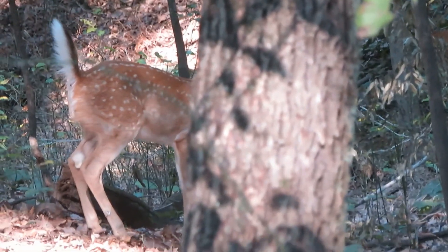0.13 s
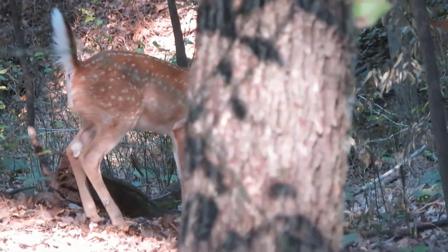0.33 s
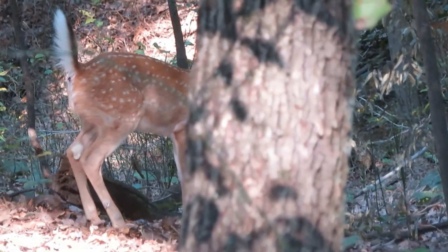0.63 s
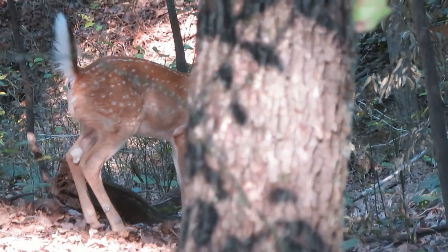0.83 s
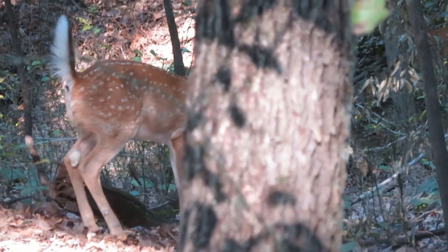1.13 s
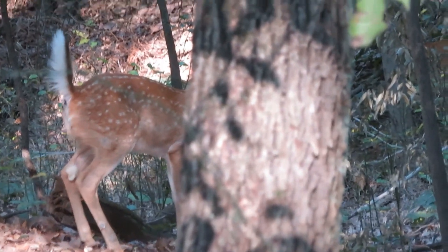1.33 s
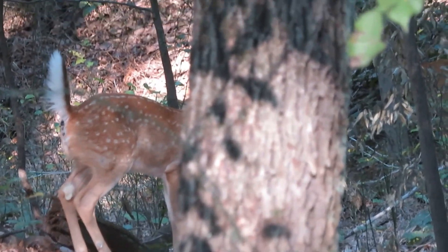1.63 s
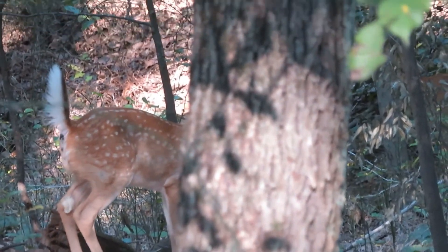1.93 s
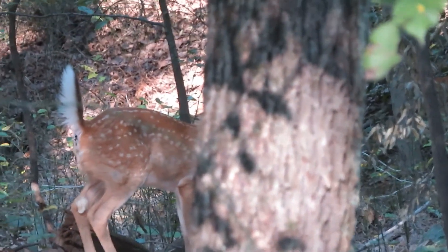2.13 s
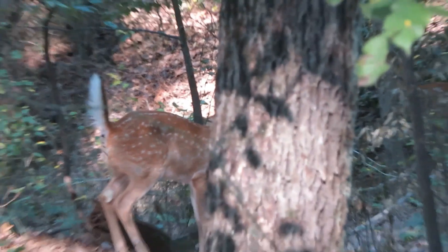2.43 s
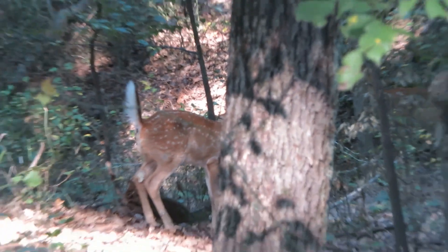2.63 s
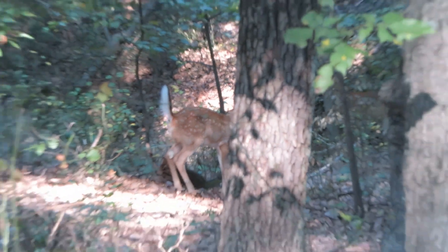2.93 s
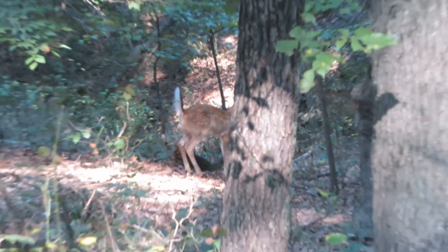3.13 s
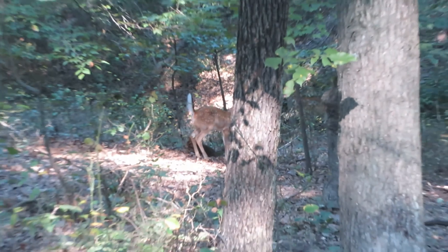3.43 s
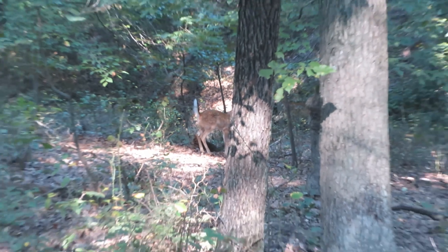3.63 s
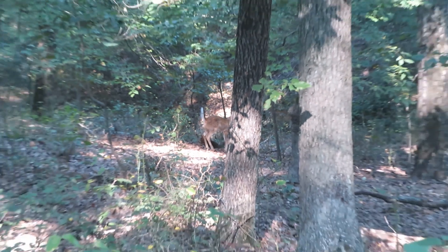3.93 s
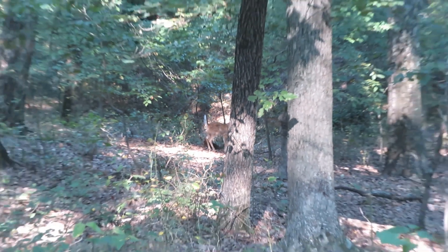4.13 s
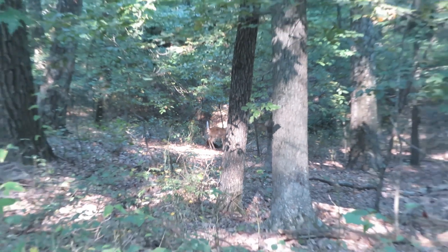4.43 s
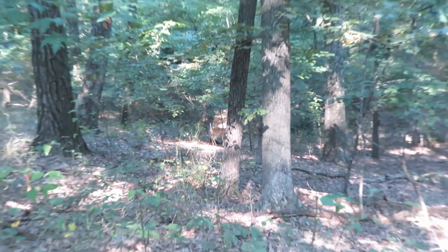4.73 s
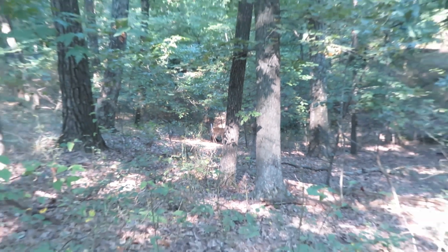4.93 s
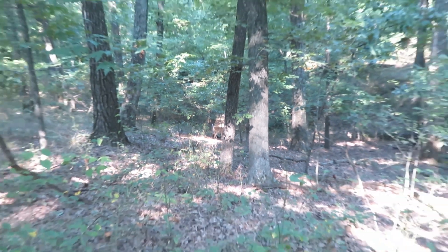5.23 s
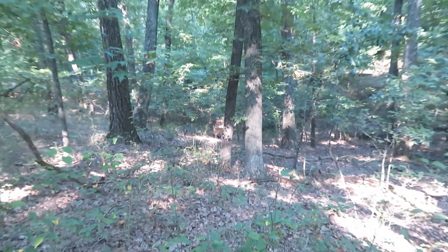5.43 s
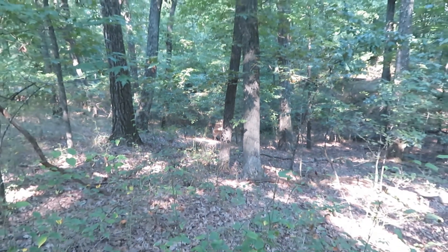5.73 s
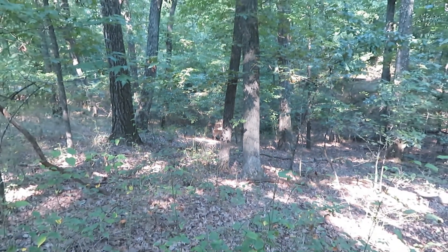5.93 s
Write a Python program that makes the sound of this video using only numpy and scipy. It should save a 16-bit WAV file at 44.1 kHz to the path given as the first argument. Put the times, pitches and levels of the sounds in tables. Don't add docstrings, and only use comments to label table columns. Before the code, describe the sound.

A quiet wood with a road far off. From 0 s a low, slightly uneven traffic rumble carries a droning engine near a low hum, while another fades away. Over it lie soft air hiss and a high, shimmering insect chorus throbbing about seven times a second, swelling until roughly 4.7 s. Two faint bird peeps come at 1.6 and 1.7 s. Around 2.3 s a car passes briefly with a short gear whine; the hiss becomes duller and patchier as the zoom runs until 5.8 s, its faint motor tone nearly buried. The engine drops at 2.5 s, then pulls again, higher, by 3.4 s. From 3.6 s a cricket chirps about seven times a second, growing louder. Traffic is strongest near 4.3 s, a second engine gaining speed, then recedes. At 5.8 s the treble opens again; at 6.05 s a hard, bright plastic click snaps close to the microphone.

```python
import sys
import numpy as np
from scipy import signal
from scipy.fft import rfft, irfft, next_fast_len
from scipy.io import wavfile
from scipy.ndimage import uniform_filter1d, map_coordinates

SR = 44100
rng = np.random.default_rng(int(sys.argv[2]) if len(sys.argv) > 2 else 0)


def master(y):
    cut = np.clip(np.atleast_2d(y).T, -1, 1)
    pcm = np.round(cut * 32767)
    wavfile.write(sys.argv[1], SR, pcm.astype(np.int16))


def undo_db(level):
    steps = np.asarray(level, float) / 20
    return 10 ** steps


N = 268921
TIME = np.arange(N) / SR

# (start [s], end [s])
ZOOM = (2.31, 5.797)


def unit(x):
    return x / np.sqrt(np.mean(x ** 2) + 1e-20)


def along(points, hz):
    f, v = np.transpose(points)
    return np.interp(np.log(hz + 1), np.log(f + 1), v)


def curves(rows):
    s, *cols = np.transpose(rows)
    return [np.interp(TIME, s, c) for c in cols]


def wobble(rate):
    return map_coordinates(rng.standard_normal(int(N * rate / SR) + 4), [TIME * rate])


def filtered(x, response):
    m = next_fast_len(N + 8192)
    return irfft(rfft(x, m) * response(np.fft.rfftfreq(m, 1 / SR)), m)[..., :N]


def patchy(patchy_db):
    z = signal.stft(rng.standard_normal(N + 1024), nperseg=1024)[2]
    field = uniform_filter1d(rng.standard_normal(z.shape), size=4, axis=0)
    field = uniform_filter1d(field, size=5, axis=1)
    return signal.istft(z * undo_db(patchy_db * unit(field)), nperseg=1024)[1][:N]


def rush(spectrum, patchy_db):
    return unit(filtered(patchy(patchy_db), lambda hz: undo_db(along(spectrum, hz))))


def tone(hz, drift_hz, flutter_db):
    phase = 2 * np.pi * np.cumsum(hz + drift_hz * wobble(12)) / SR + rng.uniform(0, 2 * np.pi)
    return np.sqrt(2) * undo_db(flutter_db * wobble(7.9)) * np.sin(phase)


def burst(s, length):
    return np.sin(np.pi * np.clip((TIME - s) / length, 0, 1)) ** 2


def hiss():
    # (frequency [Hz], density [dB per Hz])
    hiss_spectrum = [(240, -22), (400, -5), (477, -1.5), (515, 0.5), (698, 2), (799, -1), (1550, -5),
                     (3000, -5), (3900, -29), (6600, -120)]
    return undo_db(-49) * rush(hiss_spectrum, patchy_db=0.9)


def spread():
    # (frequency [Hz], density [dB per Hz])
    wide_spectrum = [(35, -50), (60, -36), (198, -2), (233, 0.5), (470, 2), (595, -5.5), (739, -3),
                     (1700, -8), (4500, -5), (5850, -23), (9900, -120)]
    return undo_db(-53.0) * rush(wide_spectrum, patchy_db=-1.0)


def lens():
    step_hz = 200
    # (multiple of step rate [1], level [dB])
    lens_orders = [(4, -69), (5, -70), (6, -66), (7, -69), (11, -70)]
    running = (TIME > ZOOM[0]) & (TIME < ZOOM[1])
    return running * sum(undo_db(db + 3) * np.sin(2 * np.pi * k * step_hz * TIME + k) for k, db in lens_orders)


def swell_db():
    db_per_s, full_s = 1.07, 4.7
    return db_per_s * np.minimum(TIME, full_s)


def buzz():
    start_db, yields, stop_s = -49, 0.37, 5.75
    # (frequency [Hz], density [dB per Hz])
    buzz_spectrum = [(2000, -31), (2700, -10), (3500, -1.5), (4200, -9), (5500, -29), (8000, -120)]
    buzz_db = start_db - yields * swell_db() - 100 * np.clip(TIME - stop_s, 0, .15)
    return undo_db(buzz_db) * rush(buzz_spectrum, patchy_db=2.6)


def insects():
    chorus_db, throb_hz = -43, 7.13
    # (frequency [Hz], density [dB per Hz])
    chorus_spectrum = [(2350, -24.5), (4000, -2), (4150, -3.5), (5630, 2), (6990, -1), (8770, -10.5),
                       (10000, -13), (11100, -19.5), (13000, -18.5), (13900, -23.5), (14900, -30)]
    # (centre [Hz], width [Hz], lift [dB])
    singers = [(4280, 28, 4.5), (5727, 88, -9.5), (5770, 35, 11.5), (5800, 31, 1), (6116, 76, 5.5),
               (6390, 62, 5), (6440, 38, -12), (7100, 100, -0.5), (7520, 110, 7.5), (7870, 73, 5.5),
               (8300, 60, 7), (9140, 104, 9.5), (9340, 240, -11), (10700, 480, -2.5)]
    # (frequency [Hz], difference minus sum [dB])
    chorus_wide = [(4000, -13.5), (6000, -5.5), (8000, -4.5), (11000, -1.5), (15000, 3)]

    def colour(hz):
        lift = sum(db / (1 + (2 * (hz - c) / w) ** 2) for c, w, db in singers)
        width_db = [0 * hz, along(chorus_wide, hz)]
        return undo_db(along(chorus_spectrum, hz) + lift + width_db) * (hz < 15150)

    pair = filtered(np.array([patchy(patchy_db=1.16), patchy(patchy_db=3.5)]), colour)
    high = filtered(pair, lambda hz: 1 / (1 + (8300 / (hz + 1)) ** 12))
    throb = np.cos(2 * np.pi * throb_hz * (TIME - 3.992) + .3 * wobble(1.2))
    double = 2 * throb ** 2 - 1
    low_db = .65 * throb + .55 * double + .25 * wobble(8)
    high_db = 1.4 * throb + 1.1 * double + .35 * wobble(8)
    voices = undo_db(low_db) * (pair - high) + undo_db(high_db) * high
    return undo_db(chorus_db + swell_db()) * voices / pair[0].std()


def cricket():
    first_s, every_s, count = 3.596, .1388, 17
    start_db, db_per_s, scatter_db, scatter_s = -48.5, 4.5, 1, 0.0036
    since = every_s * np.arange(count)
    chance = rng.standard_normal((count, 2))
    starts = first_s + since + scatter_s * chance[:, 0]
    levels = start_db + db_per_s * since + scatter_db * chance[:, 1]
    chirps = sum(undo_db(db) * burst(s, 0.057) for s, db in zip(starts, levels))
    strokes = undo_db(1.9 * np.cos(2 * np.pi * 90 * TIME))
    upper = tone(5200, drift_hz=45.1, flutter_db=0.2)
    lower = undo_db(-9) * tone(4320, drift_hz=60.2, flutter_db=3.5)
    return chirps * strokes * (upper + lower)


def bird():
    # (time [s], peak level [dB])
    peeps = [
        (1.615, -57),
        (1.735, -59),
    ]
    envelope = sum(undo_db(db) * burst(s, 0.034) for s, db in peeps)
    return envelope * tone(2030, drift_hz=15, flutter_db=.4)


def button():
    # (time [s], peak level [dB], brightness [dB])
    contacts = [
        (6.0454, -27, 17),
        (6.0495, -17, 6),
        (6.0524, -1.5, -3),
        (6.0552, -29, 24),
    ]
    # (frequency [Hz], left level [dB], right level [dB], decay time T60 [s])
    plastic = [(407, -34, -29, 0.017), (760, -22, -17.5, 0.012), (1385, -32, -29.5, 0.039),
               (1664, -35, -13.5, 0.014), (1910, -14, -30.5, 0.0098), (2500, -19, -19, 0.012),
               (3617, -5, 2, 0.006), (3825, 2.5, -9, 0.0055), (4850, -2, -12, 0.0024),
               (6430, -4.5, -2.5, 0.0047), (8600, -17, -20, 0.0068)]
    out = np.zeros((2, N + SR))
    t = np.arange(SR // 10) / SR
    lag = np.array([[.00007], [0]])
    for s, db, bright_db in contacts:
        scatter = .6 * rng.standard_normal(len(plastic))
        ring = 0
        for (hz, left, right, t60), c in zip(plastic, scatter):
            decay = undo_db(np.array([[left], [right]]) + c - 60 * t / t60)
            ring = ring + decay * np.sin(2 * np.pi * hz * (t - lag))
        crack = undo_db(bright_db - 16.5 - 60 * t / 0.0074) * rng.standard_normal((2, len(t)))
        onset = (1 - np.exp(-t / 0.0011)) ** 2
        out[:, round(s * SR):][:, :len(t)] += undo_db(db + 14.5) * onset * (ring + crack)
    return filtered(out[:, :N], lambda hz: 1 / (1 + (hz / 15000) ** 30))


def gear_whine():
    # (time [s], pitch [Hz], level [dB])
    whine = [
        (2, 154.9, -73),
        (2.2, 162.3, -48.5),
        (2.45, 162.7, -42),
        (2.62, 163.3, -47),
        (2.75, 162.5, -70),
    ]
    gear_hz, whine_db = curves(whine)
    return undo_db(whine_db) * tone(gear_hz, drift_hz=2.8, flutter_db=1.2)


def truck():
    # (time [s], shaft rate [Hz], level [dB])
    shaft = [
        (0, 23.3, -80),
        (3.2, 23.5, -74),
        (4, 23.68, -56.5),
        (4.6, 24.1, -52.5),
        (5.3, 24.61, -51.5),
        (6.1, 24.8, -55),
    ]
    # (multiple of shaft rate [1], level [dB])
    orders = [(8.35, 3), (10, 2.5), (12, 2.5), (13, -1), (14, -16), (15, 0.5), (16, 1.5)]
    shaft_hz, truck_db = curves(shaft)
    lines = sum(undo_db(db) * tone(k * shaft_hz, drift_hz=1.224, flutter_db=1.0) for k, db in orders)
    return undo_db(truck_db) * lines


def droning_engines():
    leaving_hz, leaving_db, leaving_db_per_s = 117.3, -41.5, -7.5
    # (time [s], pitch [Hz], level [dB])
    drone = [
        (0, 109.2, -38.5),
        (.7, 112, -44),
        (1.2, 117, -42),
        (2, 114.5, -40),
        (2.5, 112, -49),
        (2.85, 116.6, -47),
        (3.35, 126.1, -37.5),
        (4.2, 124.1, -38),
        (5.3, 125.1, -39),
        (6.1, 126.1, -40.5),
    ]
    drone_hz, drone_db = curves(drone)
    cruising = undo_db(drone_db - 1.2) * tone(drone_hz, drift_hz=1.8, flutter_db=2.5)
    leaving = undo_db(leaving_db + leaving_db_per_s * TIME) * tone(leaving_hz, drift_hz=1.42, flutter_db=1.5)
    return cruising + leaving


def road_noise():
    deep_base_db, deep_follows, surge_db = -46.5, 0.099, 1.43
    # (time [s], level [dB])
    road = [
        (0, -44),
        (1.5, -45.5),
        (2.05, -46),
        (2.3, -42),
        (2.6, -46.5),
        (3.4, -44.5),
        (4.3, -39.5),
        (5.5, -43),
        (6.1, -48),
    ]
    # (frequency [Hz], density [dB per Hz])
    deep_spectrum = [(12, -46), (20, -14), (86, 0.5), (108, -2.5), (124, -5.5), (141, -8.5), (162, -4),
                     (260, -25.5), (340, -53), (570, -120)]
    roar_spectrum = [(82, -26), (140, 2.5), (152, -19), (209, -2), (264, -7), (387, -9.5), (427, -16.5),
                     (476, -15), (600, -43), (780, -54), (1320, -120)]
    flow_db, = curves(road)
    deep_db = deep_base_db + deep_follows * (flow_db - flow_db.mean()) + surge_db * wobble(4.036)
    roar_db = flow_db + surge_db * wobble(3.974)
    deep = undo_db(deep_db + 5.5) * rush(deep_spectrum, patchy_db=-1.7)
    roar = undo_db(roar_db + 1.46) * rush(roar_spectrum, patchy_db=1.53)
    return deep + roar


def traffic():
    return road_noise() + droning_engines() + truck() + gear_whine()


def scene():
    chorus, chorus_diff = insects()
    calls = cricket() + bird()
    total = traffic() + hiss() + buzz() + chorus + calls + lens()
    diff = spread() + chorus_diff + 0.1 * calls
    return np.array([total + diff, total - diff]) + button()


def camera_filter(x, cut, gate, expand):
    rebound_db, rebound_s = 1.5, 0.2446
    hz, t, z = signal.stft(x, SR, nperseg=1024, noverlap=768)
    power = uniform_filter1d(abs(z) ** 2, size=3, axis=0)
    power = uniform_filter1d(power, size=9, axis=1)
    level_db = 10 * np.log10(abs(power) + 1e-20)
    usual_db = uniform_filter1d(level_db, size=100, axis=1)
    excess_db = np.clip(level_db - usual_db, -15, 4)
    zooming = (t > ZOOM[0]) & (t < ZOOM[1])
    treble = (hz > 500)[:, None]
    gain_db = zooming * (along(cut, hz)[:, None] + expand * treble * excess_db)
    rebound = np.sin(np.pi * np.clip((t - ZOOM[1]) / rebound_s, 0, 1))
    gain_db = gain_db + rebound_db * rebound * treble
    margin_db = (1 + expand * zooming) * excess_db - along(gate, hz)[:, None]
    kept = 1 / (1 + np.exp(-np.clip(margin_db / .6, -30, 30)))
    return signal.istft(z * undo_db(gain_db) * kept, SR, nperseg=1024, noverlap=768)[1][:N]


def top_cut(x):
    return signal.sosfilt(signal.butter(12, 16400, fs=SR, output="sos"), x)


def record(dry):
    # (frequency [Hz], gain [dB])
    sum_cut = [(400, -0.5), (600, -5.5), (1500, -7), (2600, -5.5), (3500, -6.5), (4400, -7.5), (5400, -7),
               (6100, -1), (7500, -2.5), (9000, -6.5), (14000, -11.5)]
    diff_cut = [(200, 1), (400, 1), (1000, 1), (2500, 4), (4000, -4), (6100, -5), (9000, -7.5),
                (14000, -11)]
    # (frequency [Hz], level from the usual [dB])
    sum_gate = [(3000, -14), (8600, -12), (9450, -3), (10000, -8), (11000, -2.8), (13000, -2.8), (15000, 0)]
    diff_gate = [(1500, -12), (2800, -1), (4200, -5), (7500, -9), (9200, -2.5), (11000, -9), (13000, -11),
                 (15000, 0)]
    total = camera_filter((dry[0] + dry[1]) / 2, sum_cut, sum_gate, expand=0.66)
    diff = camera_filter((dry[0] - dry[1]) / 2, diff_cut, diff_gate, expand=0.27)
    x = np.array([total + diff, total - diff])
    x = x / (1 + abs(x) ** 8) ** (1 / 8)
    return top_cut(x)


dry = scene()
out = record(dry)
master(out)
```